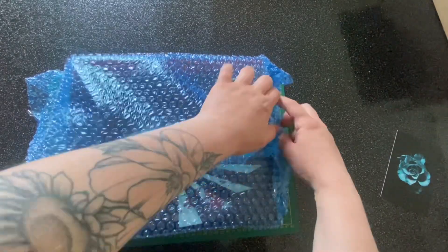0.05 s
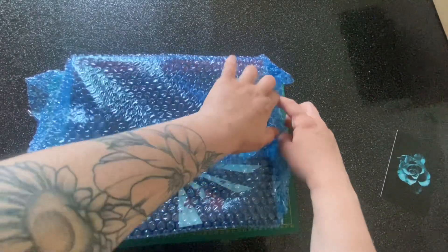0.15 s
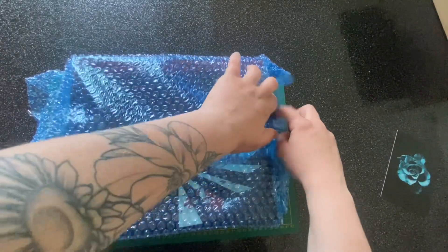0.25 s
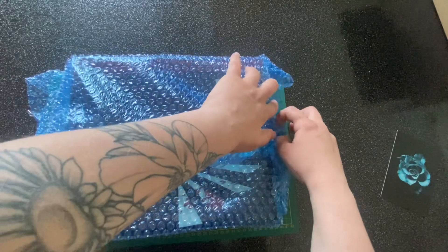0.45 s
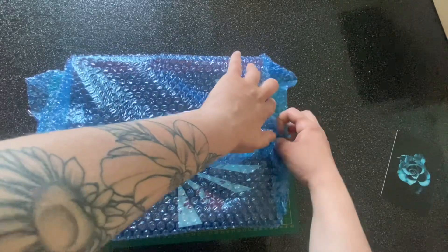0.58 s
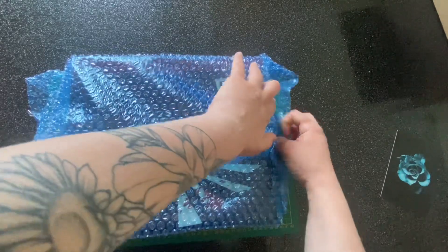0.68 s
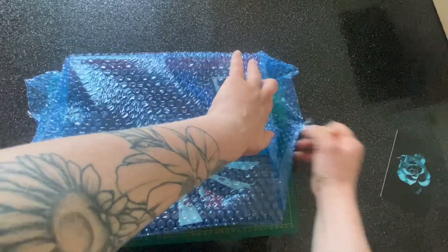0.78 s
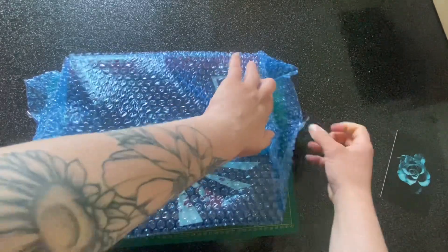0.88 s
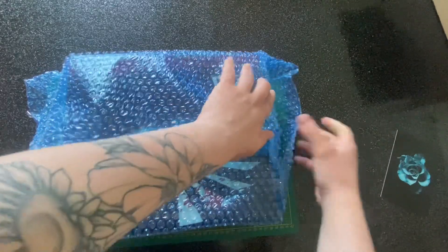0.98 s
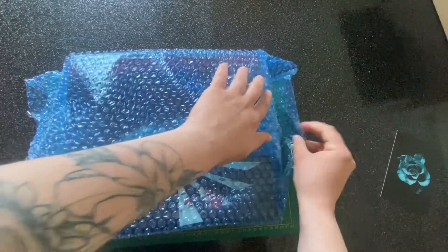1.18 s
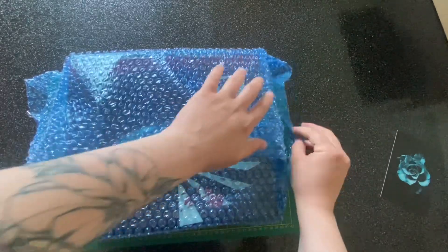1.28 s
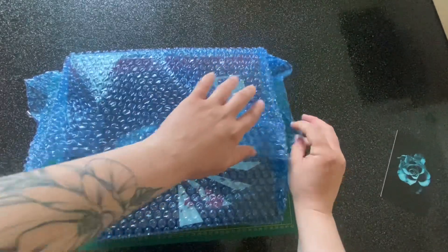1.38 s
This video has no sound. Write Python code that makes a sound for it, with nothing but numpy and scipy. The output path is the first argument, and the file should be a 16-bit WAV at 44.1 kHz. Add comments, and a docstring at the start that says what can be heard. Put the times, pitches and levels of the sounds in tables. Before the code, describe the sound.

Plastic bubble wrap crackles under tugging fingers, with sharp pops and a dull box knock

```python
"""Fingers pull bubble wrap off a cardboard package on a desk, heard close by in stereo.
The film snaps as creases buckle (clicks through resonances), rasps where it drags (runs of slips)
and crackles finely under strain (tiny ringing ticks on a rustle of noise).
The box below knocks and rumbles in its own modes, the desk booms and shakes as low rings and noise,
and a short room and a soft room tone surround it all; the left leads the right in phase."""
import sys
import numpy as np
from scipy import signal
from scipy.fft import rfft, irfft, next_fast_len
from scipy.io import wavfile

SR = 44100
rng = np.random.default_rng(int(sys.argv[2]) if len(sys.argv) > 2 else 0)


def gain_from_db(level_db):
    """Convert decibel levels to linear amplitude factors (20 dB per decade)."""
    decades = np.asarray(level_db, float) / 20
    return 10 ** decades


def put_to_file(sound):
    """Save the sound as 16-bit audio at rate SR, in the file named by the first command-line argument."""
    columns = np.atleast_2d(sound).T  # one column per channel
    safe = np.clip(columns, -1, 1)
    whole_steps = np.round(safe * 32767)
    wavfile.write(sys.argv[1], SR, whole_steps.astype(np.int16))


N = 63945


def at_hz(points, hz):
    """Reads a spectrum table on a log-frequency axis."""
    p = np.array(points, float)
    return np.interp(np.log(hz + 1), np.log(p[:, 0] + 1), p[:, 1])


def rms_one(x):
    """Scales to rms 1."""
    return x / np.sqrt(np.mean(x ** 2) + 1e-20)


def coloured_noise(points):
    """White noise given the colour of a spectrum table, at rms 1."""
    gain = gain_from_db(at_hz(points, np.fft.rfftfreq(N, 1 / SR)))
    return rms_one(irfft(rfft(rng.standard_normal(N)) * gain, N))


def drift(rate_hz):
    """Slow random wandering at rms 1: white noise through two equal one-pole lowpasses."""
    r = np.exp(-2 * np.pi * rate_hz / SR)
    wander = signal.lfilter([1], [1, -2 * r, r * r], rng.standard_normal(N + SR))
    return rms_one(wander[SR:])   # the first second only settles the filter


def resonance(x, hz, q):
    """A two-pole bandpass whose peak has gain 1."""
    r = np.exp(-np.pi * hz / q / SR)
    poles = [1, -2 * r * np.cos(2 * np.pi * hz / SR), r * r]
    return signal.lfilter([(1 - r * r) / 2, 0, (r * r - 1) / 2], poles, x)


def double_resonance(x, hz, q_first, q_second):
    """Two bandpasses in a row on one pitch, at rms 1."""
    return rms_one(resonance(resonance(x, hz, q_first), hz, q_second))


def ring(x, hz, t60):
    """A damped mode: a unit click sets a decaying sine of height 1 ringing."""
    r, w = gain_from_db(-60 / (t60 * SR)), 2 * np.pi * hz / SR
    return signal.lfilter([0, np.sin(w)], [1, -2 * r * np.cos(w), r * r], x + 1e-18)


def filtered(x, design):
    """Runs a sound through a filter given as second-order sections."""
    return signal.sosfilt(design, x)


def stereo(middle, side):
    """Left is middle plus side, right is middle minus side."""
    return middle + side * [[1], [-1]]


def add(out, sound, s, db):
    """Mixes a sound in at a time in seconds, with its peak at db."""
    i = int(s * SR)
    out[i:i + len(sound)] += (gain_from_db(db) * sound / np.abs(sound).max())[:N - i]


# Colour of the room tone. Each row: frequency in Hz, relative level in dB per Hz.
AIR_COLOUR = [(30, -12), (60, -9), (200, -7), (400, -16), (800, -6), (2000, 0), (6000, -5.5), (16000, -49)]


def room_tone():
    """Steady coloured noise, with a side part stronger than the middle."""
    middle, side = coloured_noise(AIR_COLOUR), coloured_noise(AIR_COLOUR)
    return gain_from_db(-67) * stereo(middle, 1.6 * side)


def room(x):
    """Reflections from eight feedback delays a side, duller on every round."""
    t60_s, gain_db = 0.4, -17
    wall_cut_hz = 4060   # for a lag of 1/30 s; shorter lags dull less per round
    size = next_fast_len(N + SR)
    hz = np.fft.rfftfreq(size, 1 / SR)
    response = np.zeros((2, len(hz)), complex)
    for k, lag_s in enumerate(rng.uniform(.006, .03, 16)):
        decay = gain_from_db(-60 * lag_s / t60_s)
        dulling = 1 / (1 + 1j * hz / wall_cut_hz * np.sqrt(lag_s * 30))
        loop = decay * np.exp(-2j * np.pi * hz * lag_s) * dulling
        response[k % 2] += loop / (1 - loop) * (-1) ** (k // 2)
    # the lows are alike on both sides
    alike = 1 / (1 + (hz / 300) ** 2)
    middle = response.mean(0)
    response = middle + (1 - alike) * (response - middle)
    return gain_from_db(gain_db) * irfft(rfft(x, size) * response, size)[:, :N]


# Colour of the desk's shaking. Each row: frequency in Hz, relative level in dB per Hz.
SHAKE_COLOUR = [(30, -9), (60, -1), (100, 10), (140, 6), (220, -23.5)]


def desk_shaking(shake_db):
    """Low coloured noise that follows the desk level and wavers around it."""
    return gain_from_db(shake_db + 2.3 * drift(19)) * coloured_noise(SHAKE_COLOUR)


# The desk booms. Each row: start in seconds, peak level in dB, pitch in Hz.
DESK_BOOMS = [(0.226, -57, 60.5), (0.349, -53, 125), (0.382, -63, 128), (0.681, -44, 82),
              (0.735, -32.5, 68.6), (1.07, -54, 118), (1.141, -59, 101)]


def desk_booms():
    """A push one cycle long sets one low mode of the desk ringing."""
    out, t = np.zeros(N), np.arange(12000) / SR
    for s, db, hz in DESK_BOOMS:
        push = np.sin(np.pi * np.clip(t * hz, 0, 1)) ** 2
        add(out, ring(push, hz, t60=0.1), s, db)
    return out


# Modes of the box, for rumble and knocks. Each row: pitch in Hz, relative level in dB, t60 in seconds.
BOX_MODES = [(208, 5, 0.096), (284, 12, 0.054), (382, 3.5, 0.24), (572, 7.5, 0.14), (709, 13, 0.15),
             (831, 13, 0.078), (1053, 14, 0.11)]
# Colour of hands shifting on the box. Each row: frequency in Hz, relative level in dB per Hz.
RUMBLE_COLOUR = [(120, -21), (190, -19), (260, -1.5), (380, 3), (520, -5.5), (800, -5), (1500, -22.5)]


def box_rumble(rumble_db):
    """Hands shifting on the box: lumpy low noise that also rings the box's modes."""
    ring_db, width, lumps_db = -6.5, 0.61, 2.2
    rub = np.array([coloured_noise(RUMBLE_COLOUR) for _ in range(2)])
    modes = sum(gain_from_db(db) * ring(rub, hz, t60) for hz, db, t60 in BOX_MODES)
    middle, side = rub + gain_from_db(ring_db) * rms_one(modes)
    return gain_from_db(rumble_db + lumps_db * drift(13)) * stereo(middle, width * side)


# The box is knocked. Each row: start in seconds, peak in dB before the low cut, pitch of the thud in Hz.
KNOCK_HITS = [(.316, -37, 292), (.3305, -34.5, 318), (.3385, -32.5, 323), (.3715, -38, 302),
              (.4795, -21.5, 620), (.482, -32, 340), (.646, -27.5, 835), (.647, -19, 604),
              (.651, -40.5, 268), (.681, -26.5, 680), (.7295, -20, 1110), (.7295, -24.5, 397),
              (.7318, -22, 313), (.7365, -16.5, 296), (.774, -28.5, 189), (1.048, -50, 410),
              (1.071, -66, 600), (1.104, -36, 554), (1.3573, -41.5, 410), (1.3765, -38.5, 670),
              (1.381, -39.5, 353), (1.398, -49.5, 328), (1.419, -58, 354), (1.434, -46.5, 377)]


def box_knocks():
    """A short push makes a brief thud and rings the box's modes, in a new balance each time."""
    ring_db, thud_t60_s, floor_hz = -14.5, 0.01, 209
    out, t = np.zeros(N), np.arange(12000) / SR
    balances_db = rng.normal(0, 4.5, (len(KNOCK_HITS), len(BOX_MODES)))
    for (s, db, hz), balance_db in zip(KNOCK_HITS, balances_db):
        push = np.sin(np.pi * np.clip(t * hz * 2.54, 0, 1)) ** 2
        thud = ring(push, hz, thud_t60_s)
        modes = sum(gain_from_db(mode_db + d) * ring(push, mode_hz, t60)
                    for (mode_hz, mode_db, t60), d in zip(BOX_MODES, balance_db))
        knock = thud / np.abs(thud).max() + gain_from_db(ring_db) * modes / np.abs(modes).max()
        add(out, knock, s, db)
    return filtered(out, signal.butter(4, floor_hz, "high", fs=SR, output="sos"))


# Colour of the film's crackle and rustle. Each row: frequency in Hz, relative level in dB.
FILM_COLOUR = [(400, -49), (800, -28), (1200, -7), (1700, 2), (3000, 3), (6000, 5.5), (10000, -0.5),
               (13000, -1.5), (15600, 0.5), (16300, -32)]


def crackle_ticks():
    """Clumps of tiny clicks, each dealt to one of 20 pitches that it rings."""
    grains_per_s = 2500   # middle of the wandering rate
    spread_db = 5         # scale of the exponential spread of sizes
    sizes = gain_from_db(spread_db * np.minimum(rng.exponential(1, N), 4)) * rng.choice([-1, 1], N)
    born = rng.random(N) < grains_per_s * gain_from_db(5 * drift(40)) / SR
    dealt = rng.integers(0, 20, N)
    out = np.zeros(N)
    for k, hz in enumerate(np.geomspace(600, 15500, 20)):
        clicks = sizes * born * (dealt == k)
        ticks = rms_one(ring(clicks, hz, t60=12 / hz))   # dies in 12 cycles
        out += gain_from_db(at_hz(FILM_COLOUR, hz)) * np.sqrt(hz) * ticks
    return rms_one(out)


def rustle():
    """Smooth film noise with a flickering level, wide in the lower part and compact above."""
    level_db, flicker_db, width, wide_top_hz = 1, 2.6, 0.6, 5000
    middle, side = coloured_noise(FILM_COLOUR), coloured_noise(FILM_COLOUR)
    side = filtered(side, signal.butter(4, wide_top_hz, fs=SR, output="sos"))
    return stereo(middle, width * side) * gain_from_db(level_db + flicker_db * drift(37.5))


def crackle(strain_db):
    """The film under strain: ticks on a rustle, both following the strain level."""
    top = signal.cheby2(8, 30, 16100, fs=SR, output="sos")   # 30 dB down from 16100 Hz
    return gain_from_db(strain_db) * filtered(crackle_ticks() + rustle(), top)


# The film drags in short dense runs; narrow ones squeak.
# Each row: start in seconds, length in seconds, peak in dB before the low cut, pitch in Hz, sharpness Q.
DRAGS = [(0.185, 0.018, -31.5, 3700, 1.3), (0.239, 0.029, -26, 2150, 0.79), (0.348, 0.0029, -27, 4610, 21),
         (0.3545, 0.0049, -32, 4100, 10), (0.642, 0.0043, -17, 4150, 6), (0.6456, 0.003, -18, 1570, 4.7),
         (0.6608, 0.0019, -26, 3200, 17), (0.672, 0.0092, -21.5, 2780, 2.5),
         (0.6787, 0.0038, -20.5, 1650, 7.1), (0.725, 0.0083, -16.5, 1540, 2.7),
         (0.996, 0.0019, -33.5, 3000, 1.0), (1.1002, 0.0071, -26, 6200, 13),
         (1.102, 0.0057, -27, 1290, 2.7), (1.397, 0.011, -34, 2900, 2.1)]


def rasps():
    """Dense slips of the film under a swell, through a resonance at its pitch."""
    strong_slips_per_s, floor_hz = 6200, 600
    broad_db = 9.5   # unfiltered slips at Q 1; their share falls as Q rises
    out, t = np.zeros(N), np.arange(2048) / SR
    for (s, length_s, db, hz, q), (chance, size) in zip(DRAGS, rng.random((len(DRAGS), 2, len(t)))):
        swell = np.sin(np.pi * np.clip(t / length_s, 0, 1)) ** 0.55
        strength = (chance < strong_slips_per_s / SR) + 0.26   # weak slips fill the gaps
        slips = strength * (size - .5) * swell
        pitched = rms_one(resonance(slips, hz, q))
        add(out, pitched + gain_from_db(broad_db) / q * rms_one(slips), s, db)
    return filtered(out, signal.butter(2, floor_hz, "high", fs=SR, output="sos"))


# Creases buckle. Each row: start in seconds, peak level in dB, film pitch in Hz,
# level of the treble tick against the film in dB.
BUCKLES = [(0.069, -29, 6200, 6), (0.1245, -27.5, 3900, 40), (0.2031, -21, 5000, 5),
           (0.2216, -35, 4930, 18), (0.244, -36, 2000, 21), (0.265, -28, 3500, 8),
           (0.2947, -16.5, 3500, 10), (0.2995, -24, 3500, 3), (0.3132, -22.5, 5660, 14),
           (0.3157, -26, 3100, -2), (0.3227, -20, 3740, 10), (0.3295, -17, 4500, 13),
           (0.3318, -25, 4760, 11), (0.3364, -32, 3280, 0), (0.446, -28, 5100, 8), (0.477, -2, 3570, 10),
           (0.4781, -20.5, 1085, -27), (0.4873, -23, 6060, -12), (0.5201, -18, 5600, 4),
           (0.5844, -9, 3430, 1.5), (0.6, -44, 5300, -16), (0.6022, -19, 5100, 8), (0.606, -10.5, 3570, 3),
           (0.61, -23, 4700, 16), (0.6232, -17.5, 3100, -4), (0.6344, -5, 3640, 7),
           (0.6419, -10, 4160, 10.5), (0.6495, -10.5, 4370, 5), (0.6513, -9, 3380, -4),
           (0.6619, -11.5, 3200, 19), (0.7276, -10, 5170, 3), (0.9523, -25.5, 2140, -33),
           (0.9628, -34, 6000, -10), (0.9953, -57, 3000, -9), (1.0306, -48, 9000, 3),
           (1.0477, -25.5, 1270, 1), (1.0477, -34, 5500, -13), (1.0575, -38, 1470, -15),
           (1.068, -31, 5530, -5), (1.0715, -26.5, 1270, -25), (1.074, -29, 4000, -8),
           (1.0782, -34, 1690, -15), (1.0846, -22, 5800, 2), (1.0845, -19.5, 1400, 14),
           (1.092, -39, 2800, -6), (1.1009, -21, 3300, -4), (1.1106, -18, 3370, -2), (1.127, -36, 1290, -5),
           (1.128, -43, 5750, 6), (1.1298, -27, 5000, 4), (1.243, -27.5, 6200, 5), (1.272, -29, 1800, 13),
           (1.283, -32, 2750, 7), (1.321, -31, 5960, 27), (1.3558, -23.5, 5070, 31),
           (1.3557, -24.5, 1390, 3), (1.403, -34.5, 3030, 6)]


def snaps():
    """A sharp impulse and a crumbling noise tail excite a treble tick, the film's pitch and a broad body."""
    rise_s, t60_s, tail_db, body_db = 0.00025, 0.008, -19, -3
    out, t = np.zeros(N), np.arange(1024) / SR
    tail_shape = (1 - np.exp(-t / rise_s)) * gain_from_db(-60 * t / t60_s)
    click = np.arange(len(t)) == 16
    for (s, db, hz, bright_db), noise in zip(BUCKLES, rng.standard_normal((len(BUCKLES), len(t)))):
        buckle = gain_from_db(tail_db) * noise * tail_shape + np.sign(noise[0]) * click   # random polarity
        tick = double_resonance(buckle, 7900, 5.0, 0.91)
        tick = tick - gain_from_db(-6) * double_resonance(buckle, 14900, 0.8, 0.8)
        film = double_resonance(buckle, hz, 1.6, 1.0)
        body = double_resonance(buckle, 1600, 1.0, 0.53)
        add(out, film + gain_from_db(body_db) * body - gain_from_db(bright_db) * tick, s, db)
    return out


# Phase between left and right. Each row: frequency in Hz, lead of the left in radians.
PHASE_LEAD = [(0, 0), (1400, .15), (3000, .5), (5500, 1.0), (7500, 3.14), (10300, 6.28), (13500, 9.42),
              (16700, 12.6), (22050, 17)]


def stereo_phase(x):
    """Stereo phase processing: left leads right by a phase that grows with frequency."""
    size = next_fast_len(N + 512)
    lead = np.interp(np.fft.rfftfreq(size, 1 / SR), *np.transpose(PHASE_LEAD))
    turn = np.exp(.5j * lead)   # half the lead on each side
    return irfft(rfft(x, size) * np.array([turn, 1 / turn]), size)[:, :N]


# How hard the hands work. Each row: time in seconds, then levels in dB of the fine crackle of film
# under strain, of hands shifting on the box, and of the desk shaking.
HANDLING = [(0.0, -52.5, -84.5, -100), (0.14, -54, -104, -86), (0.171, -55.5, -71, -79),
            (0.222, -53, -71, -74), (0.29, -51.5, -60, -75), (0.34, -45.5, -64, -83),
            (0.386, -48, -61, -86), (0.42, -48.5, -57, -99), (0.458, -52.5, -64, -81),
            (0.483, -43, -59, -73), (0.552, -49.5, -56.5, -92), (0.642, -45.5, -59, -89),
            (0.69, -42.5, -78, -62), (0.714, -45.5, -58, -66), (0.739, -39, -48, -41.5),
            (0.806, -54.5, -55, -65.5), (1.042, -63, -64.5, -67.5), (1.051, -48.5, -50, -70.5),
            (1.155, -51, -59, -54.5), (1.174, -52, -66.5, -82), (1.238, -54.5, -62.5, -79),
            (1.264, -58, -66, -95), (1.308, -58, -75, -83), (1.332, -68, -96, -95),
            (1.351, -55.5, -67, -91), (1.358, -56.5, -60, -92), (1.45, -63, -70, -98)]


def scene():
    """Film, box and desk, their room and the room tone, all through the stereo phase processing."""
    s, *controls = np.transpose(HANDLING)
    strain_db, rumble_db, shake_db = (np.interp(np.arange(N) / SR, s, c) for c in controls)
    film = snaps() + rasps() + crackle(strain_db)
    box = box_knocks() + box_rumble(rumble_db)
    desk = desk_booms() + desk_shaking(shake_db)
    package = film + box + desk
    return stereo_phase(package + room(package.mean(axis=0)) + room_tone())


def top_cut(x):
    """Nothing passes above the cut-off."""
    return signal.sosfilt(signal.butter(12, 17110, fs=SR, output="sos"), x)


def record(dry):
    """Cuts the lows below 45 Hz and the top, 60 dB down from 17100 Hz."""
    x = filtered(dry, signal.butter(4, 45, "high", fs=SR, output="sos"))
    x = filtered(x, signal.cheby2(12, 60, 17100, fs=SR, output="sos"))
    return top_cut(x)


dry = scene()
out = record(dry)
put_to_file(out)
```